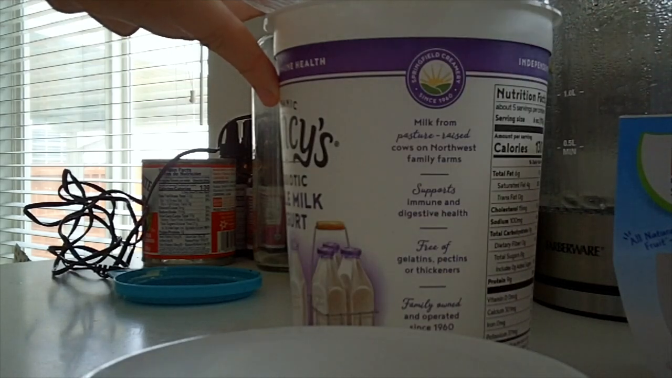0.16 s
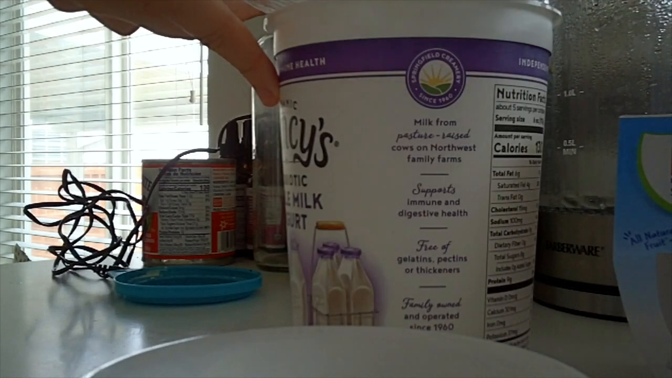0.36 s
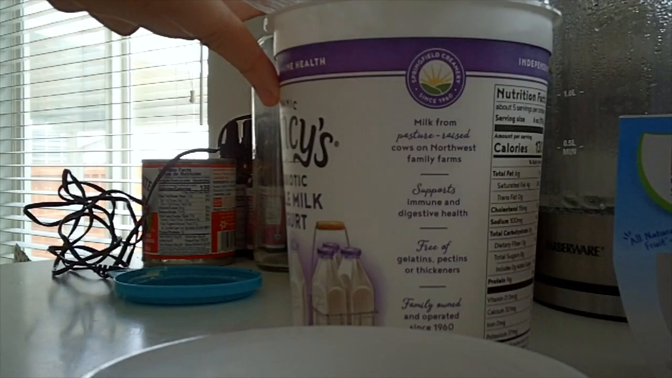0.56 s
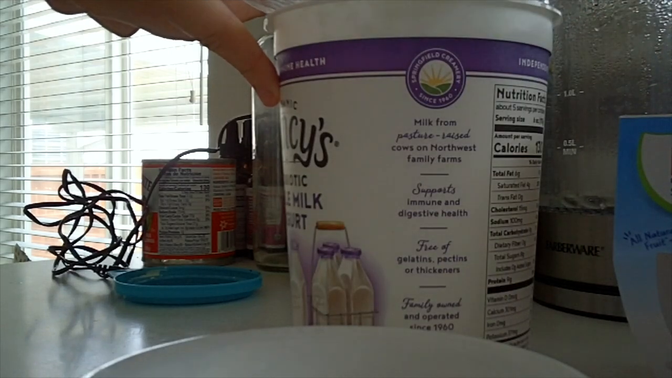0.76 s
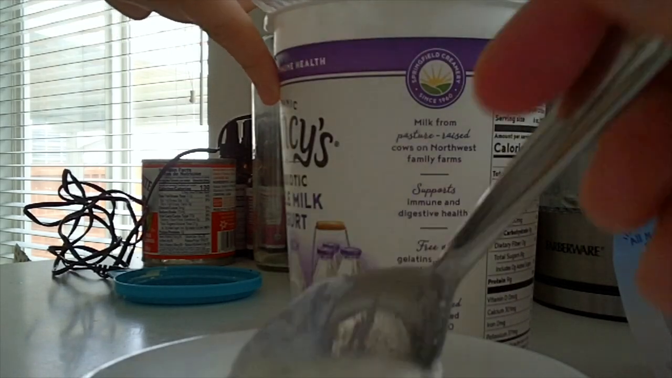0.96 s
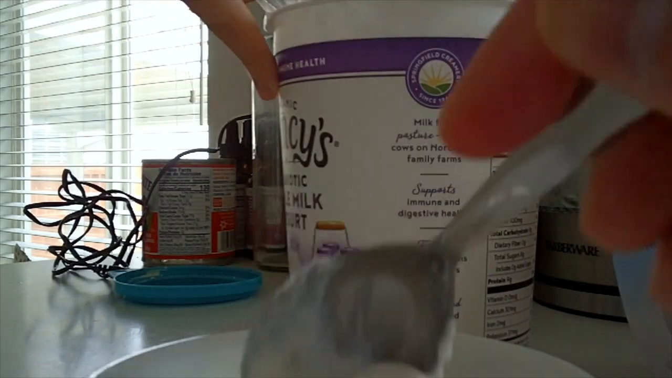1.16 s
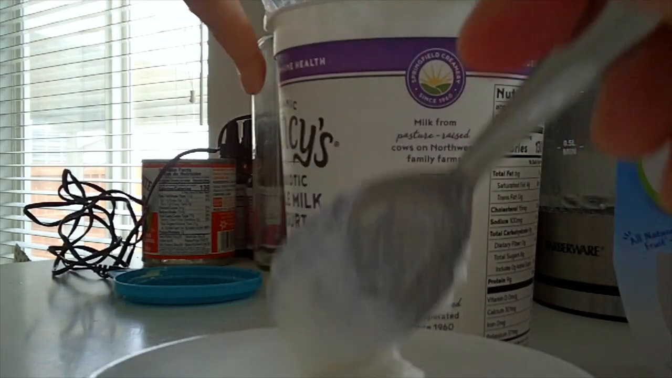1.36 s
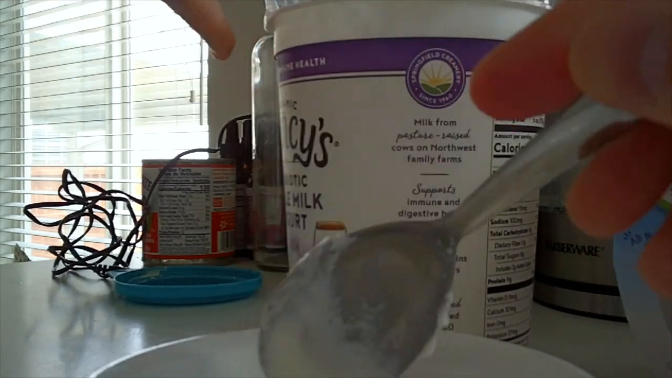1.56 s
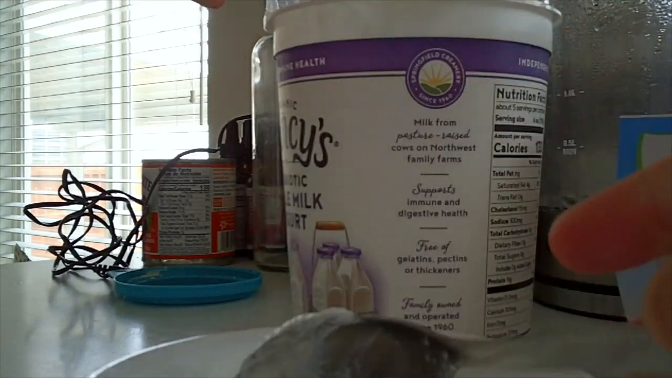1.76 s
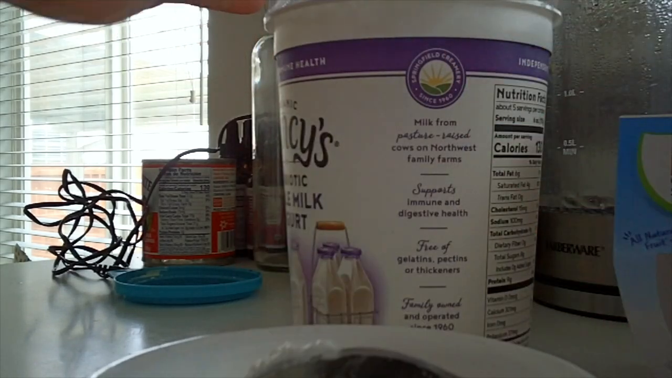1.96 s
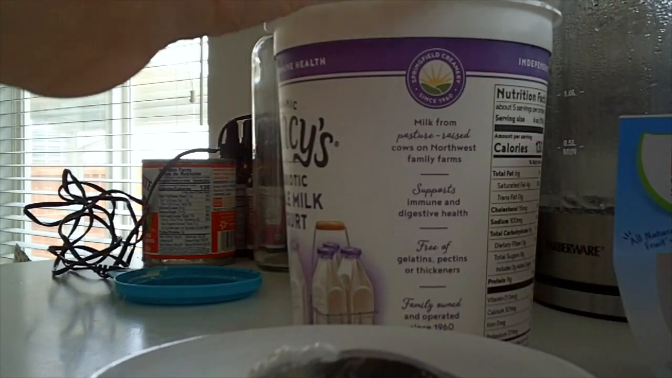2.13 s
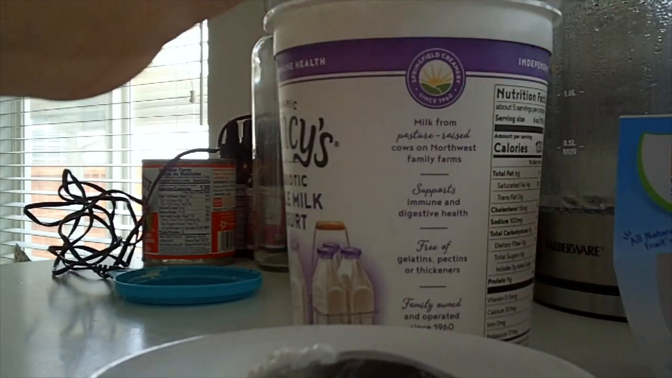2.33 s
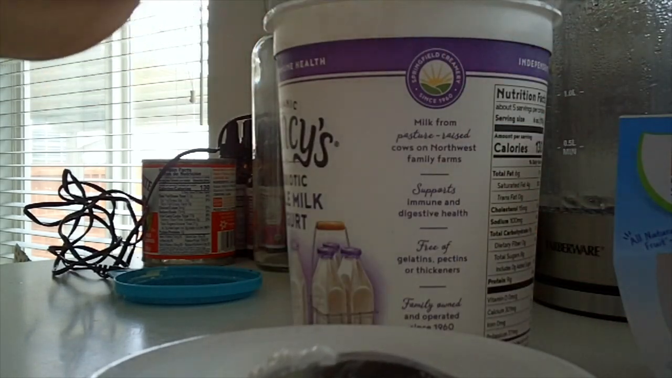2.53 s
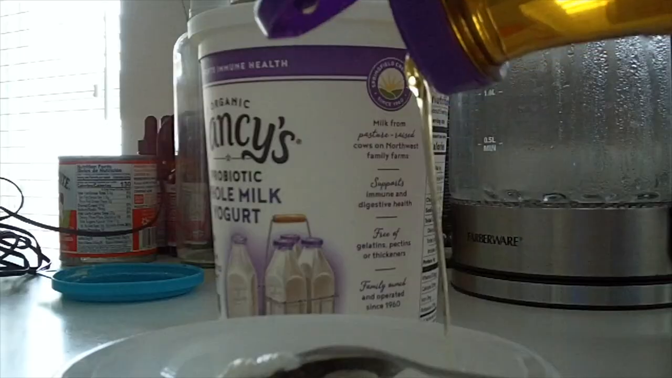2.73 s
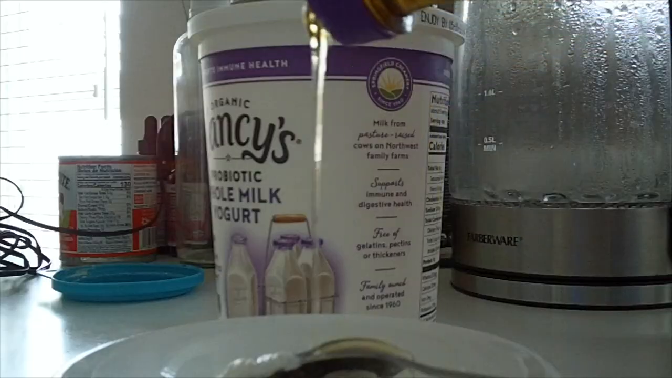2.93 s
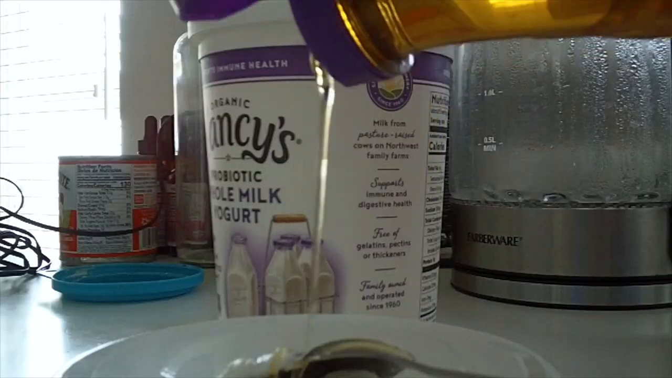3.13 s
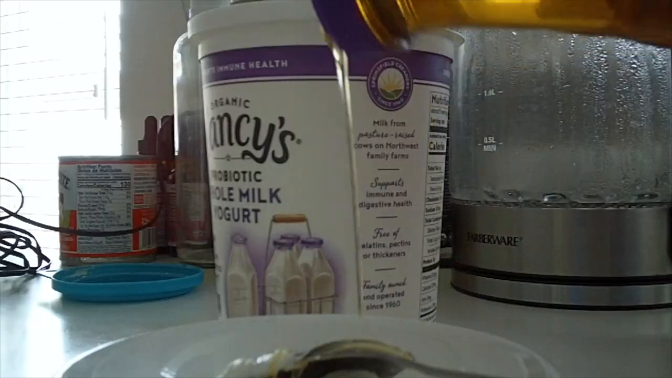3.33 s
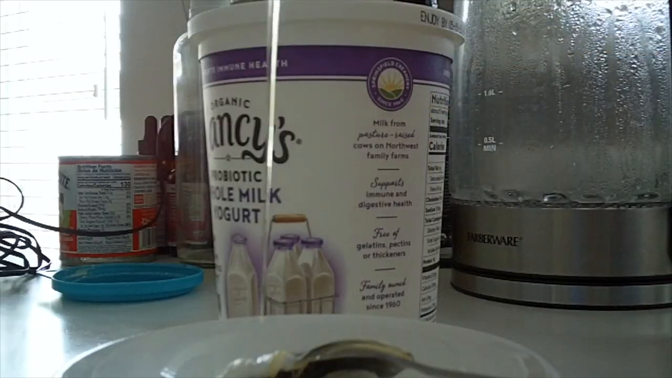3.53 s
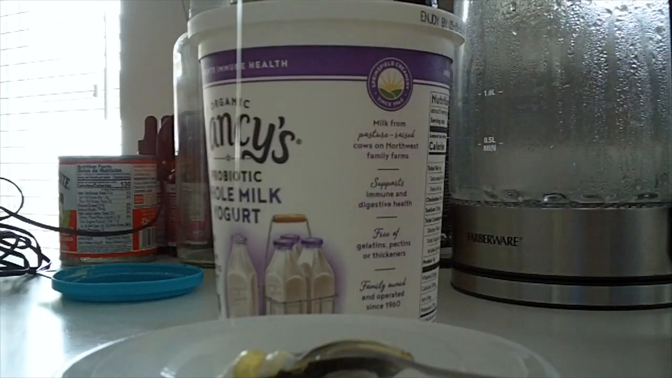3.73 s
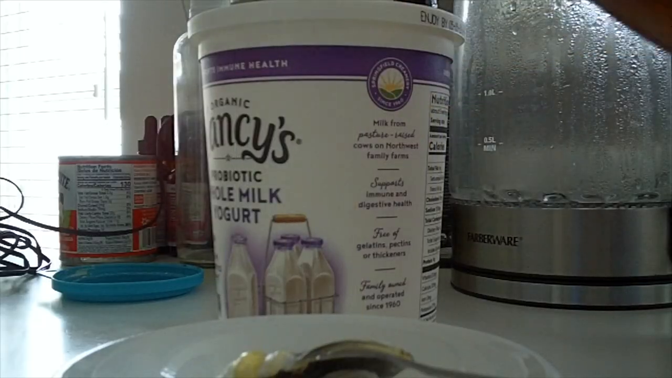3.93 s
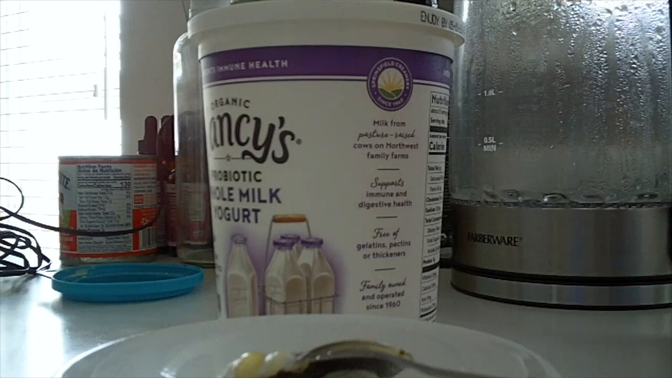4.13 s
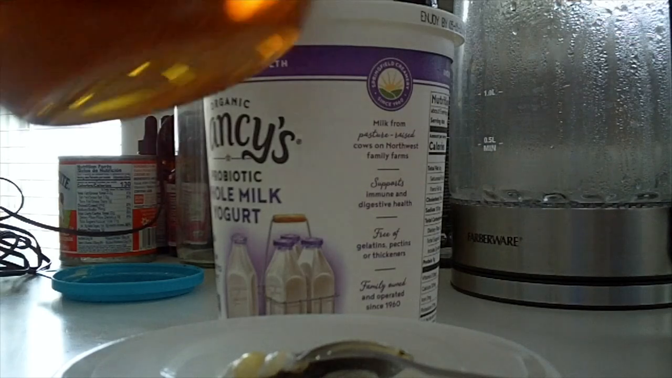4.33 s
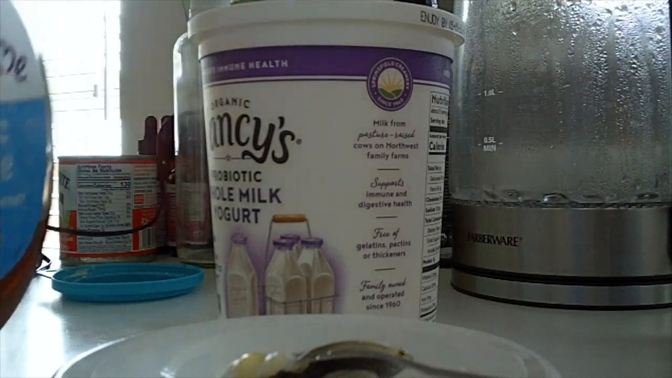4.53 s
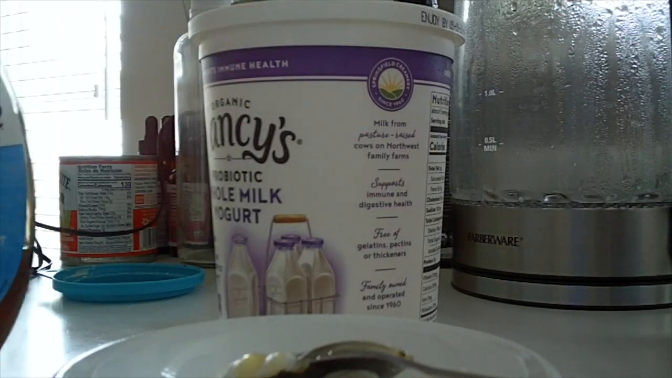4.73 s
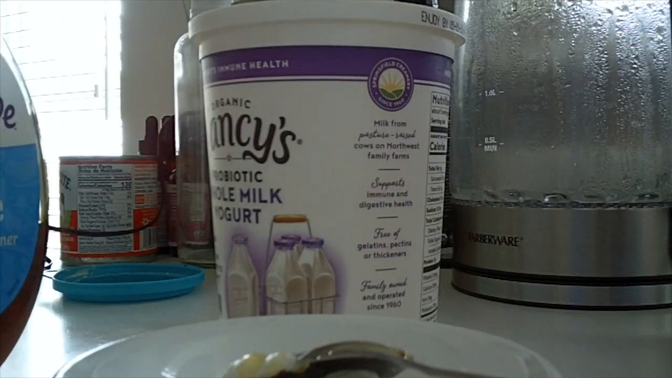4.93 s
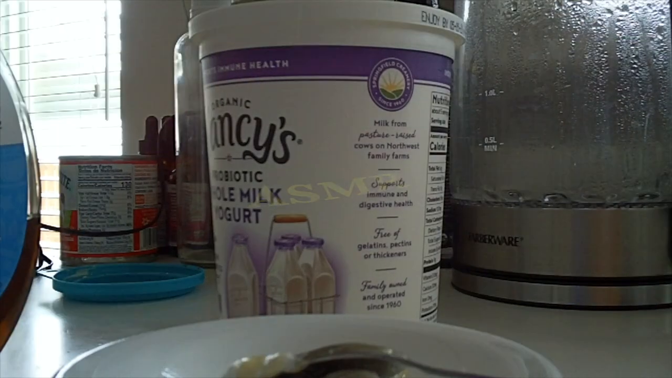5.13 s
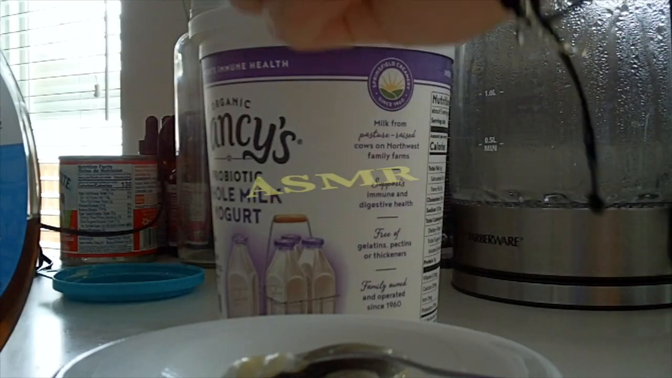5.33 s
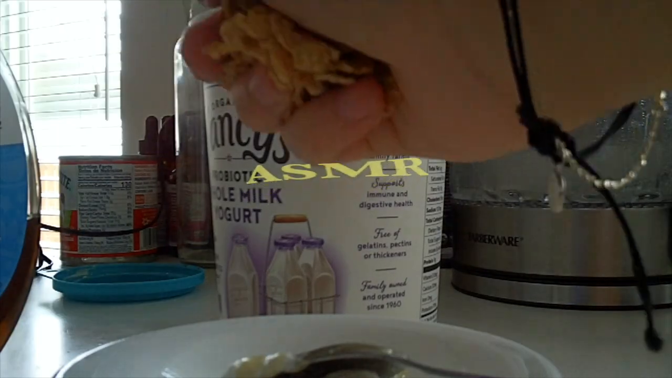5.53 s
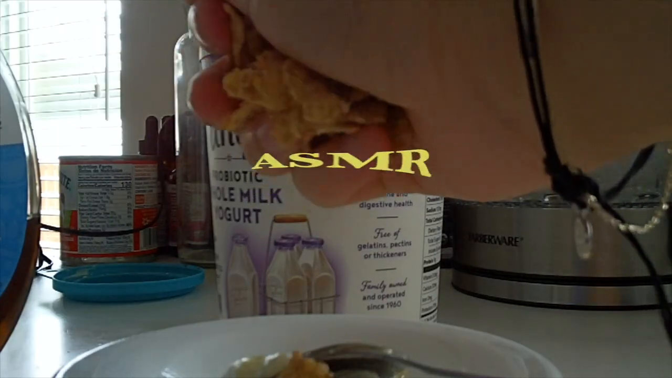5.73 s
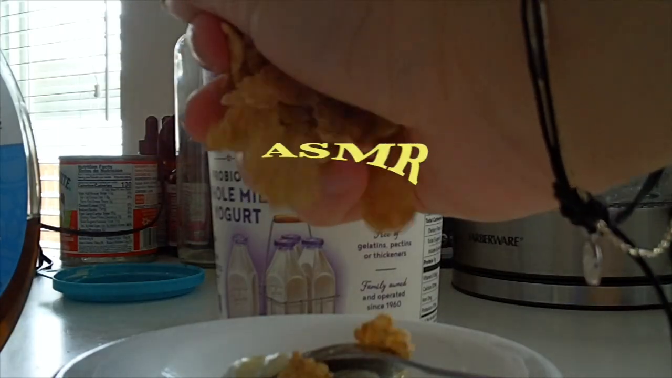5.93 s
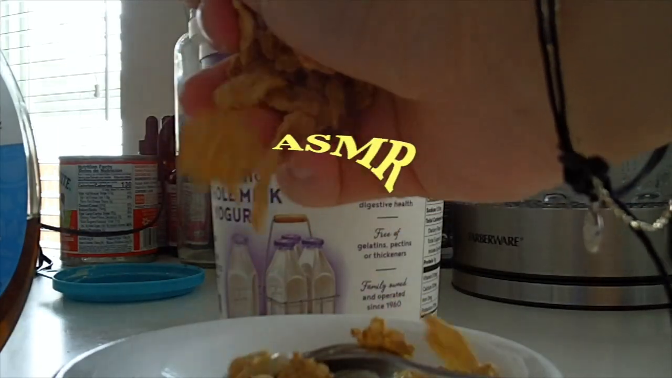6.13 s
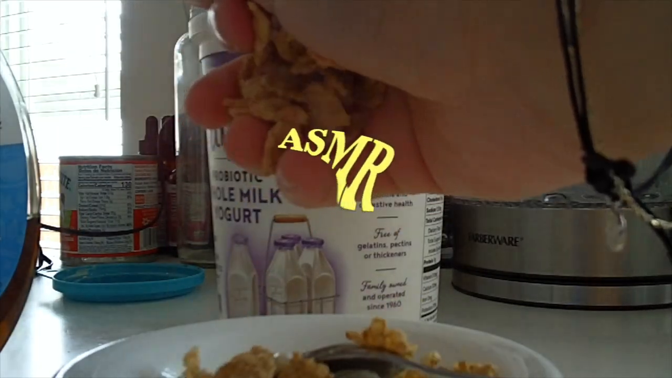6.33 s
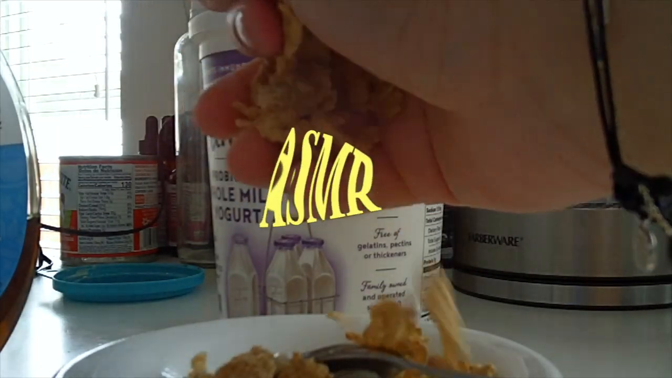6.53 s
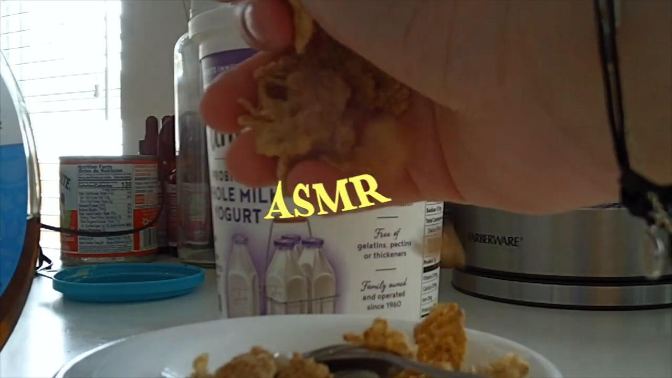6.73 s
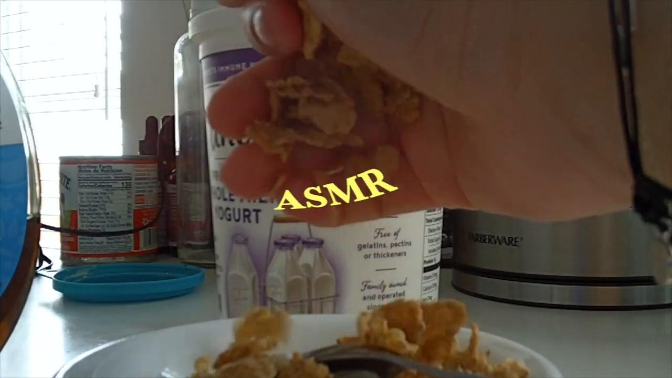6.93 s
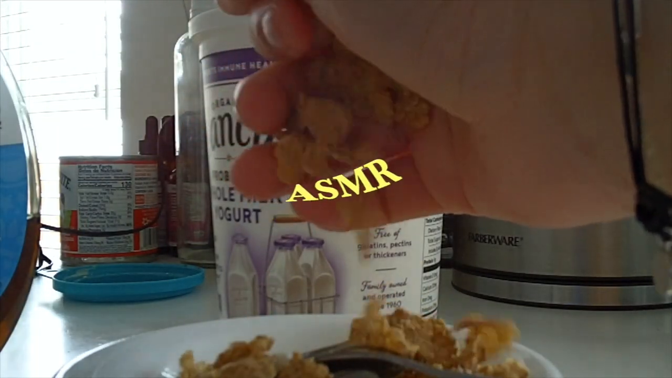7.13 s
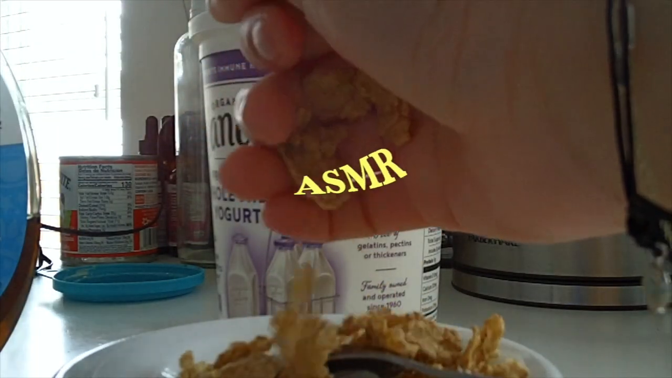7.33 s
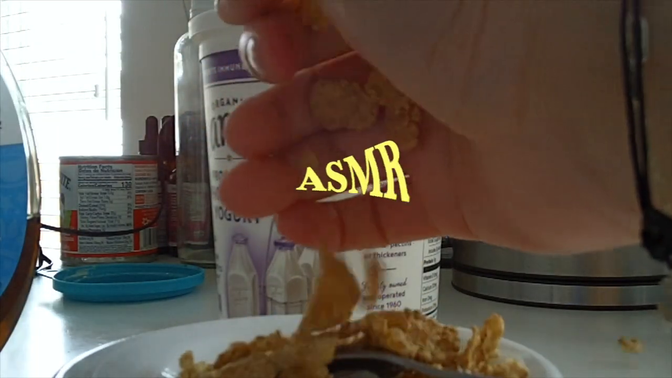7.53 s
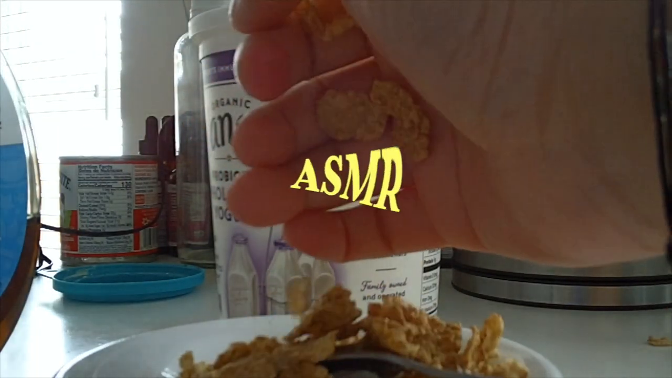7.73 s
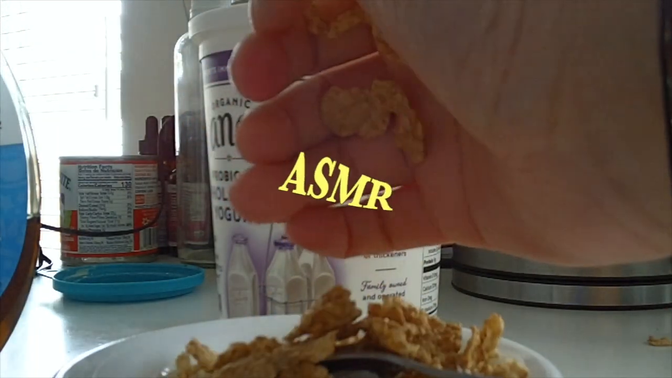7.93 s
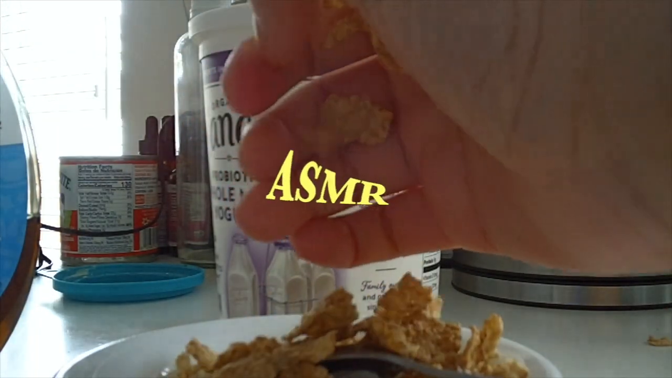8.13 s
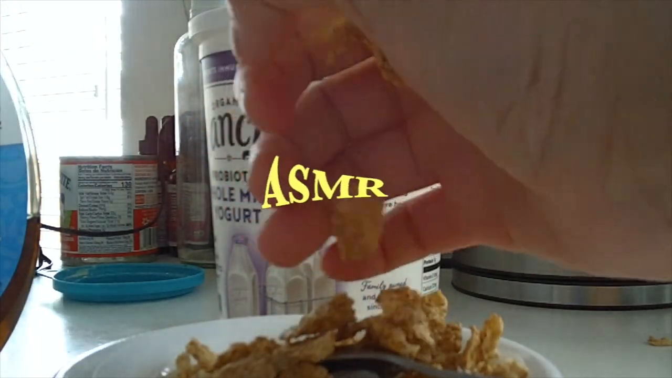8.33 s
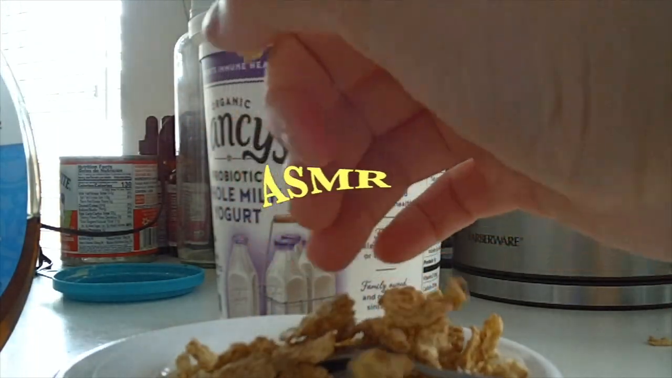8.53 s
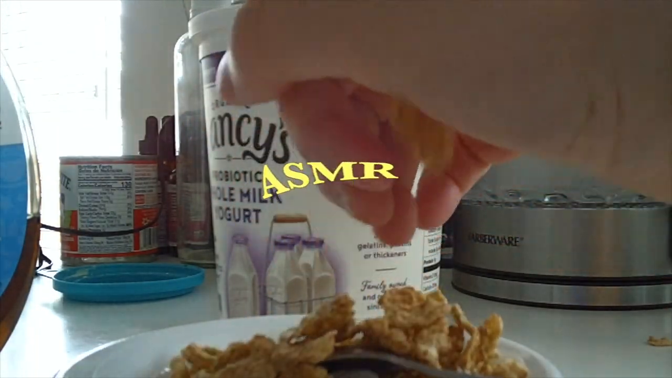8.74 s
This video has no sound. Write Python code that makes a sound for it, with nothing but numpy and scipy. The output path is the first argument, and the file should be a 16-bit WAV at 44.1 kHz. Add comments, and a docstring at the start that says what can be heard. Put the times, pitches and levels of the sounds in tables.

```python
"""Breakfast is made right beside a small camera on a kitchen counter, over soft room noise and a faint whine.
A spoon skids and drops into a china bowl (noise bursts, decaying modes); a honey bottle's cap snaps open.
The bottle hisses as it draws in air (shaped noise); a jar lands hard, the counter booms, its lid unscrews.
Last, crisp flakes are crumbled squeeze by squeeze (resonant grains and ticks); one strikes the camera.
Rubbing (dense tiny slips) runs between the blows; a short kitchen reverberation follows every source but that strike."""
import sys
import numpy as np
from scipy import signal
from scipy.fft import rfft, irfft, next_fast_len
from scipy.io import wavfile

SR = 44100
rng = np.random.default_rng(int(sys.argv[2]) if len(sys.argv) > 2 else 0)


def store_pcm(level_fs):
    """Save levels as 16-bit WAV."""
    pcm = np.round(np.clip(level_fs, -1, 1) * 32767).astype(np.int16)
    wavfile.write(sys.argv[1], SR, np.atleast_2d(pcm).T)


N = 387198
TIME = np.arange(N) / SR

# steady room noise, spectrum: hz, gain_db
ROOM_NOISE_TONE = [(20, -38), (53, -16), (242, -3), (405, -2.5), (677, -9), (911, -13), (1610, -19),
                   (2910, -26.5), (3430, -29), (4870, -49.5), (11600, -58), (16000, -73)]
ROOM_NOISE_DB = -50.5
# thin electrical whine: hz, relative_db
WHINE = [(2875, -72), (5740, -91), (11450, -97)]
# decay of the kitchen by band: hz, t60_s
KITCHEN_T60 = [(100, 0.13), (400, .5), (1200, 0.53), (4000, 0.53), (12000, .22)]
# bands the camera's housing cancels: hz, width_hz
HOUSING_NOTCHES = [(5800, 600), (8520, 600), (12000, 1300)]
CUTOFF_HZ = 15400

# hiss of the honey bottle drawing in air: hz, gain_db
PUFF_TONE = [(500, -10), (2800, 3.5), (5200, -16), (7000, -5), (10000, -17), (15000, -17)]
PUFF_S, PUFF_DB, PUFF_ATTACK_S, PUFF_HOLD_S, PUFF_T60_S = 4.096, -53, 0.0072, 0.04, 0.1

# fingers, spoon and cap hinge rubbing on plastic and china; narrow squeaks, wide hisses:
# start_s, length_s, level_db (before the swell), resonance_hz, width_hz (of each of two passes)
RUBS = [(0.416, 0.056, -57, 3030, 1500), (0.87, 0.23, -51.5, 1100, 700), (1.404, 0.18, -51, 1510, 700),
        (1.688, 0.12, -44.5, 1080, 700), (1.9, 0.28, -40, 900, 450), (2.167, 0.053, -40, 1092, 650),
        (2.41, 0.1, -55, 1300, 1013), (2.485, 0.12, -51, 3780, 450), (2.601, .07, -43.5, 1750, 600),
        (2.7, 0.029, -40.5, 1850, 350), (2.838, 0.1, -53, 1295, 1200), (3.855, 0.07, -57.5, 2840, 1100),
        (5.09, 0.23, -51, 1900, 1000), (5.1, 0.29, -48, 620, 397)]
# rustle of the rubbed surfaces: hz, gain_db
RUB_TONE = [(400, 0), (1200, 17), (2200, 10.5), (3900, 5), (5200, -31), (7200, -17), (9000, -28),
            (14500, -38)]

# Contact levels: energy of the first 14 ms, as rms over 10 ms.
# cap snaps: start_s, level_db, bass_lift_db, treble_lift_db
CAP = [(2.49, -39.5, -50, 2), (2.516, -42.5, 28, 29), (2.59, -18, -6, 0), (2.69, -32.5, -22, -7)]
# tone of the plastic cap: hz, gain_db
CAP_TONE = [(100, -25), (350, -1), (750, -5), (1200, 5), (1600, 3), (2300, -18), (3600, -6), (4700, -29),
            (5700, -45), (6800, -32.5), (9000, -49), (15000, -54)]

# jar knocks, then clicks of its lid being unscrewed: start_s, level_db, bass_lift_db, treble_lift_db
JAR = [(3.239, -42, 20, 2.5), (4.546, -32.5, 16, 5), (4.6818, -13.5, -2, 5), (4.6869, -10.5, 2.5, -6),
       (4.6985, -12, -10, -2), (4.7122, -16.5, -7, 1), (4.8014, -9, -4, -4), (4.809, -11.5, 1, 8),
       (4.8436, -11, 2.5, 0), (4.852, -16.5, -0.5, -14.5), (5.1017, -38, -18, 19), (5.119, -42, -16, 18),
       (5.163, -35, 4, 6), (5.217, -42.5, -14, 3), (5.232, -38, -3, -3), (5.272, -42.5, 0, 6)]
# tone of the jar and its lid: hz, gain_db
JAR_TONE = [(35, -44), (60, -12), (95, 0), (150, 2.5), (250, -3), (350, 3.5), (800, -3), (1400, -8),
            (2300, -19), (3800, -27.5), (5300, -62.5), (7000, -55), (10000, -78.5), (15000, -82)]
# the jar's full weight comes down, edge first, then flat: start_s, counter_boom_db, jar_ring_db
LANDINGS = [(4.6818, -22.5, -18), (4.8014, -15, -29), (4.8436, -16.5, -31)]
# jar wall, a close beating pair and an overtone: hz, strength_db, t60_s
JAR_MODES = [(750, -2, 0.28), (822, -4.5, 0.23), (1400, -6, .24)]
# counter top under the jar: hz, strength_db, t60_s
COUNTER_MODES = [(121, 4.5, 0.15), (124.6, -19, 0.62), (170, -2.5, 0.11), (339, -7, 0.29), (388, -6, 0.25)]

# spoon touches: start_s, level_db, bass_lift_db, treble_lift_db
SPOON = [(0.8884, -34.5, 2.5, -22), (1.001, -42.5, 0, 17.5), (1.292, -40, 19, -34.5),
         (1.469, -40.5, -13.5, -18), (1.497, -30.5, -7.5, -13), (1.516, -38, 10, -14),
         (1.646, -35.5, -4.5, -9), (1.698, -41.5, -2, 1.5), (1.802, -37, -9.5, -1), (1.8067, -33.5, -9, 0),
         (1.8262, -7.5, -9, 0), (1.8285, -8, 4, 0.5), (1.858, -18.5, 5, -27), (1.982, -33.5, 2, -15),
         (1.9937, -31.5, 0, -3), (2.194, -37, -0.5, -4), (2.2895, -45, 9.5, -28)]
# tone of spoon on china: hz, gain_db
SPOON_TONE = [(100, -15), (220, -6), (400, 5.5), (800, -1.5), (1500, -2), (2200, -10), (3800, -9.5),
              (4700, -22.5), (5300, -31), (7500, -25.5), (9500, -38.5), (15000, -49.5)]
# spoon skids over the china: start_s, length_s, skip_level_db, treble_lift_db
SKIDS = [(0.921, .06, -43, -3), (1.71, .08, -37, -6), (2.056, .035, -36, -17)]
SKIP_GAP_S, REBOUND_MAX_S, REBOUND_LOSS_DB = .0235, .008, 5.5
# blows that ring the bowl; small hard things favour high modes: start_s, level_db, tilt_db_per_octave
RINGS = [(1.827, -15.5, -2.5), (1.858, -30, -5), (6.2363, -42, 4.5), (8.225, -49, 3), (8.2622, -50, 4),
         (8.557, -52, 1), (8.639, -46, 0)]
# china bowl with the spoon in it: hz, strength_db, t60_s
BOWL_MODES = [(345, -12, .3), (495, -11, .2), (675, -17, .42), (980, -14, .25), (1285, -16, .13),
              (1632, -12, .12), (1722, -1, .2), (3350, -6, .05), (4606, 3, .045), (4690, -24, .2),
              (8010, -25, .2), (11000, -27, .08), (14200, -30, .08)]

# large flakes land: start_s, level_db, bass_lift_db, pitch_hz
FLAKES = [(5.668, -43.5, 13, 4040), (5.9157, -39, 3, 3330), (5.9807, -37.5, 15, 2150),
          (6.0613, -31, 5.5, 2300), (6.1228, -33.5, -12, 3400), (6.131, -31, 9, 2340),
          (6.1743, -31, 4.5, 3840), (6.2385, -31, -4, 4600), (6.2664, -31.5, -6, 3460),
          (6.2767, -32.5, 2.5, 2000), (6.379, -41.5, -7, 3100), (6.577, -35, 8, 2199),
          (6.5937, -35.5, -1, 3260), (6.616, -34, -2, 2500), (6.6388, -32, -0.5, 4630),
          (6.6698, -30, 2.5, 3430), (6.677, -33.5, 0, 2520), (6.6875, -37.5, 0, 3400),
          (6.71, -31, 12, 4600), (6.8487, -37, -3, 2450), (6.859, -38.5, -4, 4580), (6.8841, -36, -5, 4570),
          (6.8905, -36.5, -3, 4560), (6.9635, -29, 0.5, 3940), (6.9815, -35, 2, 3150),
          (7.002, -36.5, -1, 2880), (7.0094, -35.5, 3, 2520), (7.137, -36.5, 1, 3600),
          (7.1497, -36, 4, 3570), (7.229, -37.5, 2, 3470), (7.26, -28.5, -2.5, 3400),
          (7.2982, -37, 7.5, 3420), (7.346, -36.5, 0, 2523), (7.3608, -31.5, 9, 3470),
          (7.601, -28, 9.5, 2360), (7.764, -36.5, 9.5, 2396), (7.9488, -45, -3.5, 6560),
          (8.1009, -36, 2.5, 7300), (8.149, -40, 20, 6680), (8.2228, -42, -10, 4400),
          (8.301, -40.5, 9, 6910), (8.473, -39, 6.5, 3620), (8.5271, -32.5, 9.5, 2280),
          (8.558, -33.5, 0.5, 2320), (8.6568, -41.5, 2, 7600), (8.73, -41.5, -11, 2480)]
# tone of the flakes: hz, gain_db
FLAKE_TONE = [(150, -27), (300, -10), (520, 5), (950, -2.5), (1500, 0.5), (2100, -7), (3500, -2.5),
              (4600, -8), (4900, -20), (7200, -14.5), (9500, -21.5), (10400, -15.5), (11300, -30),
              (14800, -25.5)]
# the hand squeezes the flakes: start_s, length_s, crackle_level_db
SQUEEZES = [(5.638, 0.15, -55), (6.047, 0.25, -53), (6.379, .13, -57), (6.55, 0.2, -48.5),
            (7.102, 0.31, -51), (7.62, 0.199, -56.5), (8.147, 0.16, -57.5), (8.539, 0.23, -57.5)]
GRIP_DB_PER_S, RELAX_DB_PER_S = 176, 85
# small bits that fall during the squeezes
BITS_PER_S, BIT_ABOVE_CRACKLE_DB, BIT_SPREAD_DB, BIT_BASS_DB = 36, 7.5, 2.5, 2
BIT_LOW_HZ, BIT_HIGH_HZ = 2300, 7140
MIC_HIT_S, MIC_HIT_DB = 6.9669, -8.5

SNAP_T60_S = .005


def from_db(db):
    """Decibels to gain."""
    return 10 ** (np.asarray(db) / 20)


def rms_one(x):
    """Scale to rms 1."""
    return x / np.sqrt(np.mean(x ** 2) + 1e-20)


def at_hz(points, hz):
    """Read a table on a log-frequency axis."""
    knots, values = np.transpose(points)
    return np.interp(np.log(hz + 1e-3), np.log(knots), values)


def colour(x, *tones):
    """Causal (minimum-phase) filter with the summed gains of hz, gain_db tables."""
    size = 2 * next_fast_len(len(x))
    hz = np.arange(size // 2 + 1) * SR / size
    gain_db = sum(at_hz(tone, hz) for tone in tones)
    # folding the cepstrum gives minimum phase
    cepstrum = irfft(np.log(from_db(gain_db)))
    cepstrum[1:size // 2] *= 2
    cepstrum[size // 2 + 1:] = 0
    response = np.exp(rfft(cepstrum))
    return irfft(rfft(x, size) * response)[:len(x)]


def add(out, start_s, sound):
    """Mix a sound in at start_s."""
    start = int(start_s * SR)
    out[start:start + len(sound)] += sound[:max(N - start, 0)]


def resonate(x, hz, width_hz):
    """Two-pole resonance, gain about 1 at its peak."""
    r = np.exp(-np.pi * width_hz / SR)
    zeros = np.array([1, 0, -1]) * (1 - r * r) / 2
    poles = [1, -2 * r * np.cos(2 * np.pi * hz / SR), r * r]
    return signal.lfilter(zeros, poles, x + 1e-18)


def high_pass(x, order, hz):
    """Butterworth high-pass."""
    return signal.sosfilt(signal.butter(order, hz, "high", fs=SR, output="sos"), x)


def ring(modes, contact_s, tilt_db=0):
    """Decaying modes built up over the contact, tilted per octave about 2 kHz, uneven from blow to blow."""
    t = TIME[:SR // 2]
    out = 0
    for hz, db, t60_s in modes:
        strength_db = db + tilt_db * np.log2(hz / 2000) + rng.normal(0, 1)
        out = out + from_db(strength_db - 60 * t / t60_s) * np.sin(2 * np.pi * hz * t)
    return out * (1 - np.exp(-(t / contact_s) ** 2))


def grains(per_s, spread_db):
    """Random clicks of very uneven size and either sign."""
    sizes = from_db(spread_db * np.minimum(rng.exponential(1, N), 4))
    sizes = sizes * rng.choice([-1, 1], N)
    return sizes * (rng.random(N) < per_s / SR)


def contact(level_db, bass_db, treble_db, tone, snap, chatter, chatter_t60_s,
            boom, boom_hz, boom_t60_s, pitches=()):
    """Click and snap, chatter of the surfaces, longer dull boom of the body; pitches: hz, width_hz, gain."""
    t = TIME[:SR // 6]
    hard, dull = rng.standard_normal((2, len(t)))
    burst = hard * (snap * from_db(-60 * t / SNAP_T60_S) + chatter * from_db(-60 * t / chatter_t60_s))
    dull = signal.sosfilt(signal.butter(2, boom_hz, fs=SR, output="sos"), dull)
    burst += boom * dull * from_db(-60 * t / boom_t60_s)
    burst[0] += 1  # click
    burst = burst + sum(gain * resonate(burst, hz, width_hz) for hz, width_hz, gain in pitches)
    shelves = [(600, bass_db), (1800, 0), (4000, 0), (7000, treble_db)]
    sound = colour(burst, tone, shelves)
    onset_rms = np.sqrt(np.sum(sound[:SR // 70] ** 2) / (SR / 100))
    return from_db(level_db) * sound / onset_rms


def background(whine_db, blur_hz, blur_gain):
    """Steady coloured room noise with a faint whine, each line part pure sine and part narrow noise."""
    air = from_db(ROOM_NOISE_DB) * rms_one(colour(rng.standard_normal(N), ROOM_NOISE_TONE))
    for hz, db in WHINE:
        blur = resonate(resonate(rng.standard_normal(N), hz, blur_hz), hz, blur_hz)
        line = np.sin(2 * np.pi * hz * TIME) + blur_gain * rms_one(blur)
        air += from_db(db + whine_db) * line
    return air


def kitchen(x, wet_db, near_db, near_t60_s):
    """Quick reflections from the counter and things on it, and a diffuse tail with its own decay per band."""
    t = TIME[:int(.8 * SR)]
    white = rfft(rng.standard_normal(len(t)))
    hz = np.arange(len(white)) * SR / len(t)
    tail = 0
    for centre_hz, t60_s in KITCHEN_T60:
        # bands crossfade between neighbouring centres
        share = at_hz([(knot, knot == centre_hz) for knot, _ in KITCHEN_T60], hz)
        tail = tail + irfft(white * share, len(t)) * from_db(-60 * t / t60_s)
    tail = colour(tail * (t > .012), [(100, 5.5), (600, 2.5), (1500, -2.5), (4000, -8.0), (10000, -8.5)])
    near = rng.standard_normal(len(t)) * from_db(-60 * t / near_t60_s) * (t > .004)
    near = colour(near, [(3500, -0.5), (6000, -3.5), (14000, -6.5)])
    response = from_db(wet_db) * tail + from_db(near_db) * near
    return signal.fftconvolve(x, response)[:N]


def housing(x):
    """The camera's housing cancels three narrow treble bands."""
    for hz, width_hz in HOUSING_NOTCHES:
        x = signal.lfilter(*signal.iirnotch(hz, hz / width_hz, fs=SR), x)
    return x


def puff():
    """The honey bottle draws air back in: one short burst of coloured noise."""
    t = np.maximum(TIME - PUFF_S, 0)
    attack = np.minimum(t / PUFF_ATTACK_S, 1)
    decay = from_db(-60 * np.maximum(t - PUFF_HOLD_S, 0) / PUFF_T60_S)
    hiss = rms_one(colour(rng.standard_normal(N), PUFF_TONE))
    return from_db(PUFF_DB) * attack * decay * hiss


def friction(slips_per_s, rustle_db, rustle_per_width, catch_db):
    """Dense tiny slips swell and fade per stroke and ring the rubbed thing; sharper ringing, less rustle."""
    out = np.zeros(N)
    slips = grains(slips_per_s, spread_db=5.0)
    # surfaces catch and let go every few milliseconds
    catches = rng.standard_normal(N // 200)
    slips *= from_db(catch_db * np.interp(TIME, np.linspace(0, TIME[-1], len(catches)), catches))
    rustle = colour(slips, RUB_TONE)
    for start_s, length_s, level_db, hz, width_hz in RUBS:
        span = slice(int(start_s * SR), int((start_s + length_s) * SR))
        body = rms_one(resonate(resonate(slips[span], hz, width_hz), hz, width_hz))
        rustle_gain = from_db(rustle_db) * (width_hz / 1000) ** rustle_per_width
        stroke = rms_one(body + rustle_gain * rms_one(rustle[span]))
        swell = np.sin(np.linspace(0, np.pi, len(stroke)))
        add(out, start_s, from_db(level_db) * stroke * swell)
    return out


def cap():
    """Short dry snaps of a plastic flip cap: fast-decaying contacts."""
    out = np.zeros(N)
    for start_s, *blow in CAP:
        add(out, start_s, contact(*blow, CAP_TONE, snap=.15, chatter=0.21, chatter_t60_s=0.02,
                                  boom=0.08, boom_hz=2180, boom_t60_s=0.045))
    return out


def jar():
    """After light knocks the jar lands on its edge, ringing, and rocks flat as the counter booms;
    clicks of the lid being unscrewed follow."""
    out = np.zeros(N)
    for start_s, *blow in JAR:
        add(out, start_s, contact(*blow, JAR_TONE, snap=.08, chatter=0.21, chatter_t60_s=0.053,
                                  boom=0.15, boom_hz=800, boom_t60_s=0.057))
    for start_s, counter_db, jar_db in LANDINGS:
        add(out, start_s, from_db(counter_db) * ring(COUNTER_MODES, contact_s=0.00086))
        add(out, start_s, from_db(jar_db) * ring(JAR_MODES, contact_s=0.0018))
    return high_pass(out, order=4, hz=58)


def spoon_skips():
    """Light touches at an even pace, each followed by a weaker rebound after a varying delay; rows like SPOON."""
    touches = []
    for start_s, length_s, level_db, treble_db in SKIDS:
        for k in range(int(length_s / SKIP_GAP_S) + 1):
            touches.append((start_s + k * SKIP_GAP_S, level_db + rng.normal(), 0, treble_db))
    rebounds = [(start_s + REBOUND_MAX_S * rng.uniform(.5, 1), level_db - REBOUND_LOSS_DB, *lifts)
                for start_s, level_db, *lifts in touches]
    return touches + rebounds


def spoon_and_bowl():
    """The spoon taps, skids, drops and settles; skips ring its edge, listed blows ring the china modes."""
    out = np.zeros(N)
    for start_s, *blow in SPOON:
        add(out, start_s, contact(*blow, SPOON_TONE, snap=.12, chatter=0.16, chatter_t60_s=0.019,
                                  boom=0.0662, boom_hz=1500, boom_t60_s=.13))
    spoon_edge = (3800, 600, 0.96)  # hz, width_hz, gain
    for start_s, *blow in spoon_skips():
        add(out, start_s, contact(*blow, SPOON_TONE, snap=0, chatter=0.23, chatter_t60_s=0.019,
                                  boom=0.11, boom_hz=1500, boom_t60_s=.1, pitches=[spoon_edge]))
    for start_s, level_db, tilt_db in RINGS:
        add(out, start_s, from_db(level_db) * ring(BOWL_MODES, contact_s=.0003, tilt_db=tilt_db))
    return out


def microphone_hit(port_hz, port_gain):
    """One flake strikes the camera: a blunt pressure pulse, and the microphone's port pings."""
    click = np.zeros(N)
    add(click, MIC_HIT_S, from_db([MIC_HIT_DB]))
    pulse = np.convolve(click, -np.hanning(SR // 1800))[:N]
    pulse = high_pass(pulse, order=1, hz=60)
    return pulse + port_gain * resonate(click, port_hz, width_hz=180)


def squeeze_db(t):
    """Crackle level at times t: each squeeze swells, holds and relaxes; the loudest wins."""
    levels_db = []
    for start_s, length_s, level_db in SQUEEZES:
        swell_db = GRIP_DB_PER_S * np.maximum(start_s - t, 0)
        relax_db = RELAX_DB_PER_S * np.maximum(t - start_s - length_s, 0)
        levels_db.append(level_db - swell_db - relax_db)
    return np.max(levels_db, axis=0)


def falling_bits():
    """Small bits trickle from the hand at uneven times, level following the crackle; rows like FLAKES."""
    slots = np.concatenate([np.arange(start_s, start_s + length_s, 1 / BITS_PER_S)
                            for start_s, length_s, _ in SQUEEZES])
    delay, size, pitch = rng.random((len(slots), 3)).T
    start_s = slots + delay / BITS_PER_S
    level_db = squeeze_db(start_s) + BIT_ABOVE_CRACKLE_DB + BIT_SPREAD_DB * (2 * size - 1)
    pitch_hz = BIT_LOW_HZ * (BIT_HIGH_HZ / BIT_LOW_HZ) ** pitch
    return list(zip(start_s, level_db, np.full(len(start_s), BIT_BASS_DB), pitch_hz))


def flakes(crumbs_db, crumbs_t60_s, china_gain):
    """Falling flakes tick, each at its own pitch, over the crackle of crumbs and of flakes in the hand."""
    out = np.zeros(N)
    breaking = from_db(squeeze_db(TIME))
    # each pitched fracture rings in one of 20 bands
    cracks = grains(per_s=600, spread_db=4.8)
    for hz in np.geomspace(2300, 15000, num=20):
        cracks += 7 * resonate(grains(per_s=28, spread_db=5.0), hz, width_hz=330)
    for start_s, level_db, bass_db, pitch_hz in FLAKES + falling_bits():
        overtone_hz, shard_hz = rng.uniform(5300, 7730), rng.uniform(10100, 15600)
        pitches = [(pitch_hz, 150, 2.4), (overtone_hz, 300, 1.1), (shard_hz, 400, 1.5)]
        treble_db = rng.normal(-2.0, 2.0)
        tick = contact(level_db, bass_db, treble_db, FLAKE_TONE, snap=.4, chatter=0.44, chatter_t60_s=0.033,
                       boom=0.29, boom_hz=900, boom_t60_s=0.14, pitches=pitches)
        add(out, start_s, tick)
        # a fading crackle of crumbs starts 3 ms before the tick
        crumbs = from_db(level_db + crumbs_db - 60 * TIME[:SR // 5] / crumbs_t60_s)
        add(breaking, start_s - .003, crumbs)
    crackle = colour(cracks, FLAKE_TONE, [(500, 5.0), (2500, 0.2), (9000, -1.5)])
    out += breaking * rms_one(crackle)
    # the bowl sings along; ln(1000) / (pi t60) is a mode's width in Hz
    china = sum(resonate(out, hz, np.log(1000) / (np.pi * t60_s)) for hz, _, t60_s in BOWL_MODES)
    return out + china_gain * china


def scene():
    """Everything on the counter, heard close up in the kitchen."""
    direct = puff() + cap() + jar() + spoon_and_bowl()
    direct += friction(slips_per_s=3500, rustle_db=-0.5, rustle_per_width=1.3, catch_db=3.5)
    direct += flakes(crumbs_db=-18.5, crumbs_t60_s=0.18, china_gain=0.26)
    room = kitchen(direct, wet_db=-46.5, near_db=-34.0, near_t60_s=0.051)
    heard = housing(direct + room + microphone_hit(port_hz=10300, port_gain=9.9))
    return (heard + background(whine_db=2.0, blur_hz=110, blur_gain=0.17))[None]


def record(dry):
    """The input clips at full scale; a steep low-pass cuts the top."""
    low_pass = signal.ellip(10, .2, 80, CUTOFF_HZ, fs=SR, output="sos")
    return signal.sosfilt(low_pass, np.clip(dry, -1, 1))


dry = scene()
out = record(dry)
store_pcm(out)
```